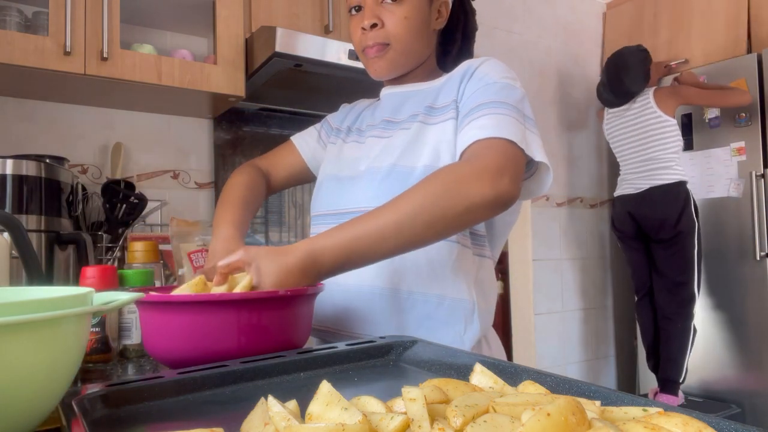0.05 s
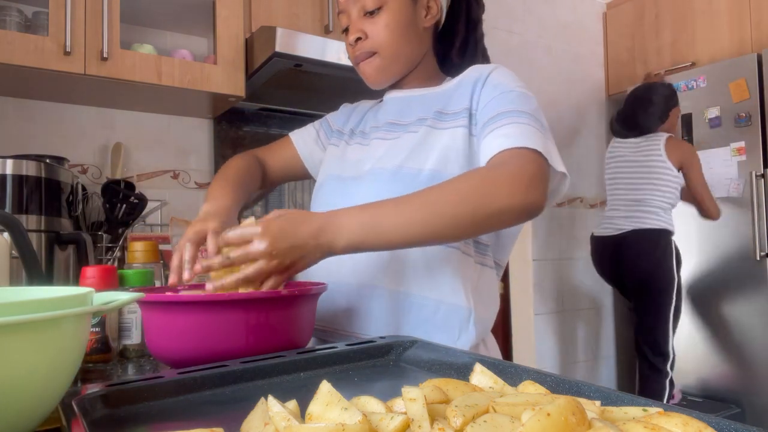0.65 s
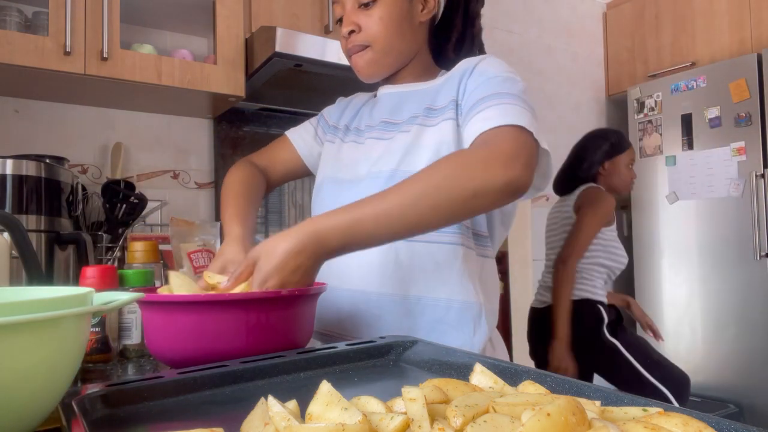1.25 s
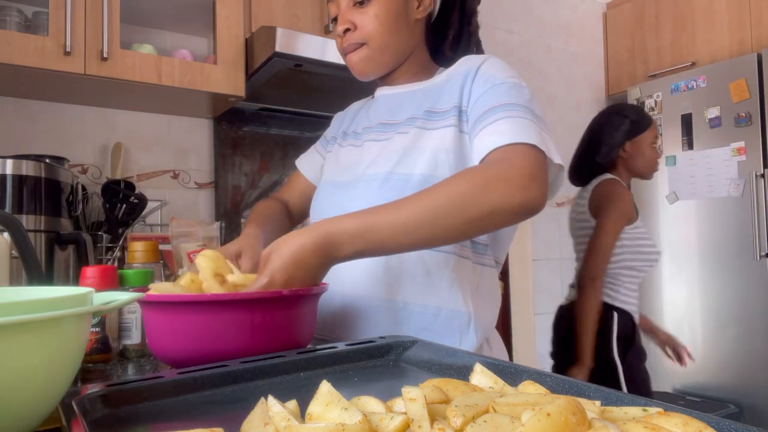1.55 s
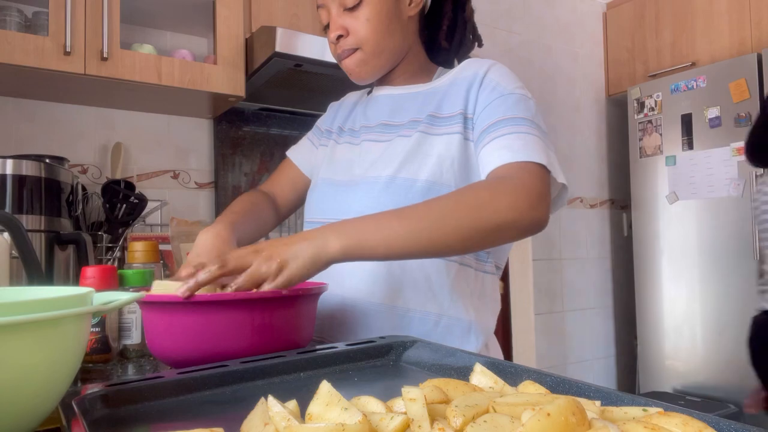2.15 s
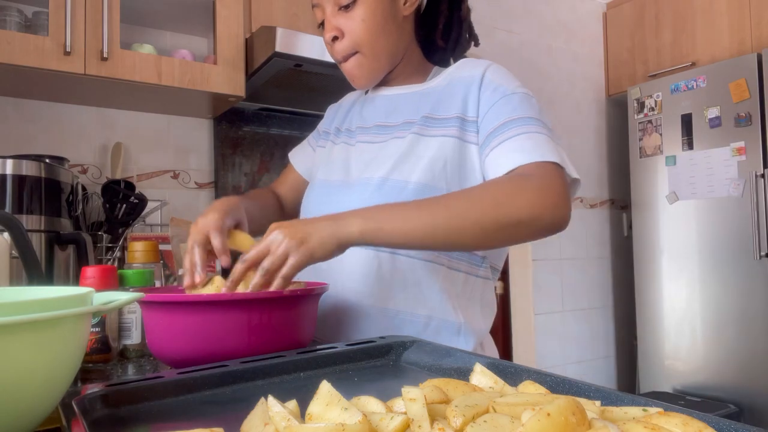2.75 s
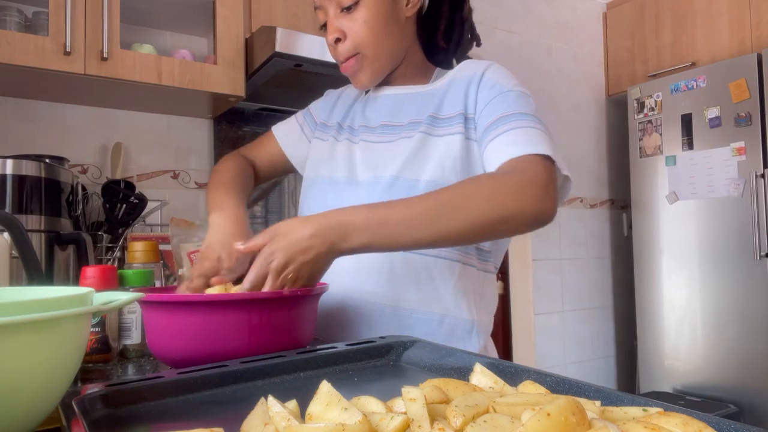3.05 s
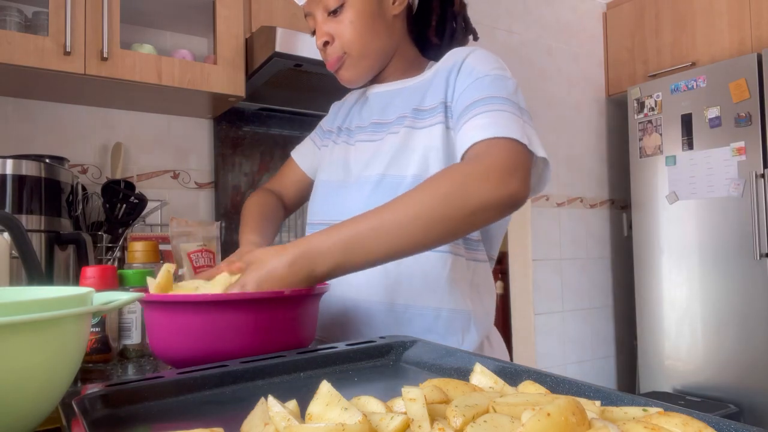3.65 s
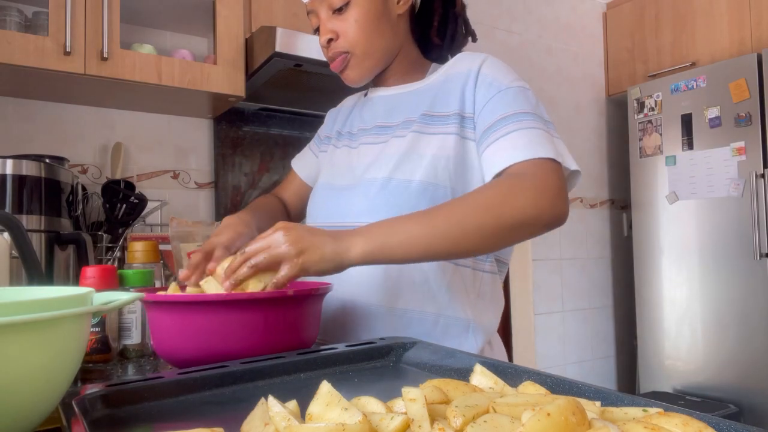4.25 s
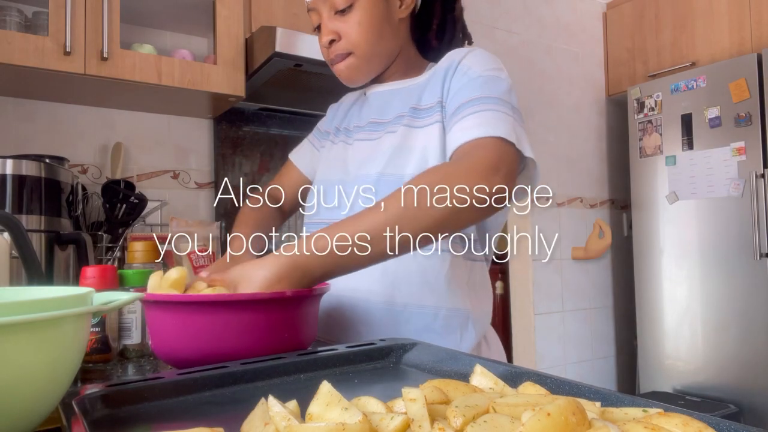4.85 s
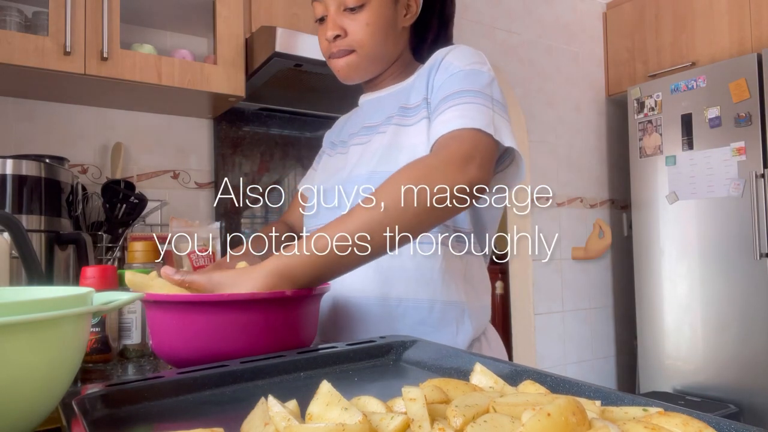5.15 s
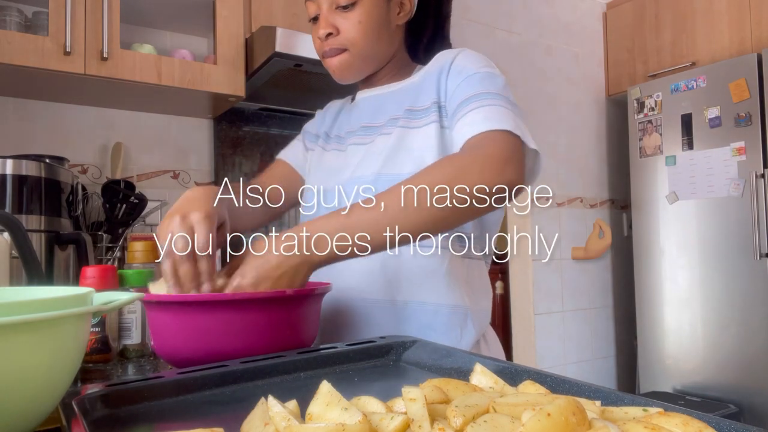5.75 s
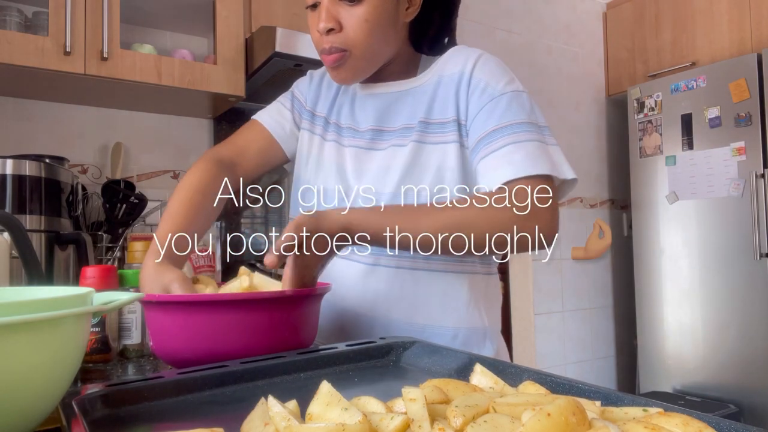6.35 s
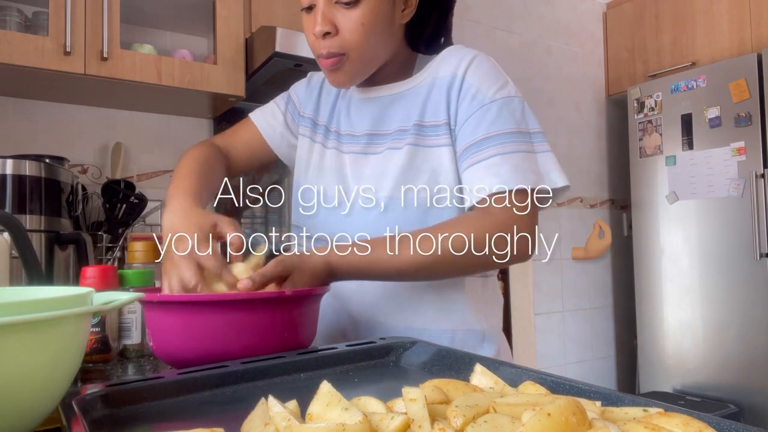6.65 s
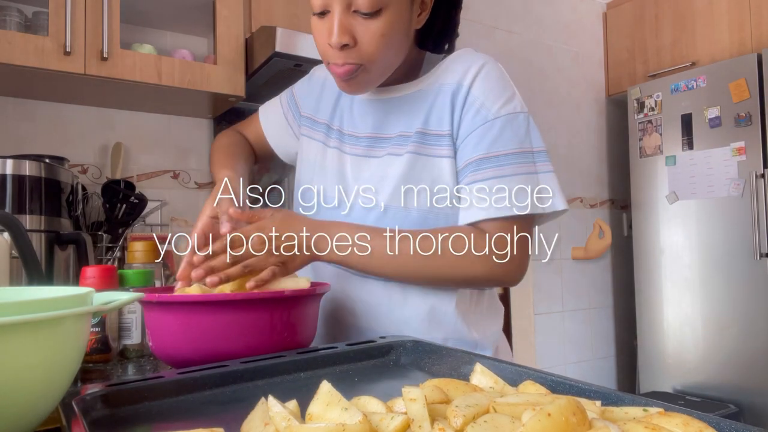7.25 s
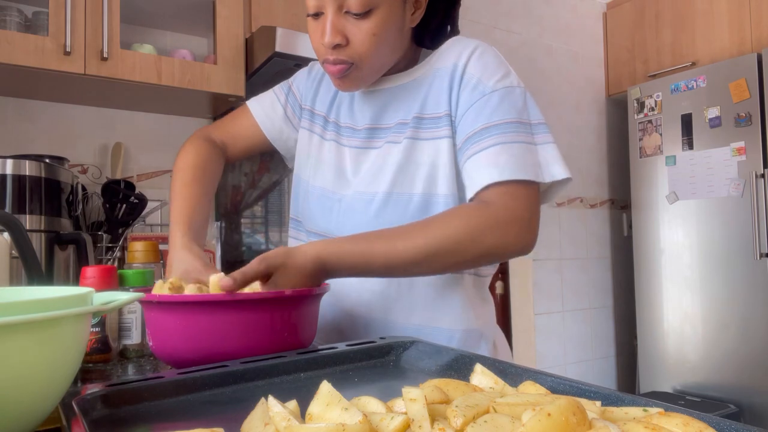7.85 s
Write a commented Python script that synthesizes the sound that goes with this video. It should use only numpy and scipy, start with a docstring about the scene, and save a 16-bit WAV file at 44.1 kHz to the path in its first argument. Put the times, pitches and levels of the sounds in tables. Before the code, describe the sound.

Hands toss and rub wet potato wedges in a plastic bowl, with hollow thuds and squelches, and a cupboard door slams early on.

```python
"""Wet thuds and rubbing: hands toss raw potato wedges in a plastic bowl on a kitchen counter.
Landings ring and rock the bowl, some with a bright wet splash or sizzle; wedges tap the wall.
Oily faces slap, scrape, squelch and snap apart. Further off a cupboard door slams and things
click and rattle. The tiled room rings briefly over a faint hush."""
import sys
import numpy as np
from scipy import signal
from scipy.fft import rfft, irfft
from scipy.io import wavfile
from scipy.ndimage import uniform_filter1d

SR = 44100
rng = np.random.default_rng(int(sys.argv[2]) if len(sys.argv) > 2 else 0)


def wav_out(sig):
    """Save sig, one row per channel (or a flat mono array), as 16-bit PCM at SR to the path in sys.argv[1]."""
    wavfile.write(sys.argv[1], SR, np.round(np.clip(np.atleast_2d(sig).T, -1, 1) * 32767).astype(np.int16))


N = 352359
EVENT_N = 24576  # samples per event
T = np.arange(EVENT_N) / SR
HZ = np.fft.rfftfreq(EVENT_N, 1 / SR)

# handfuls landing: (time [s], level [dB], push centre [Hz], slap re thud [dB], landing spread [s])
HANDFULS = [(0.022, -39, 307, -16.5, 0.091), (0.476, -28, 277, -9, 0.028), (.699, -27, 227, -2.5, 0.033),
            (0.921, -18, 224, 0, 0.025), (1.251, -23, 285, -21, 0.051), (2.005, -36.5, 250, -10, 0.022),
            (4.067, -38, 292, -6, 0.11), (4.555, -38, 250, -11, 0.097), (5.741, -30, 293, -22, 0.039),
            (6.351, -28.5, 193, -21, .018), (6.529, -25.5, 365, -11.5, 0.051),
            (6.754, -32, 315, -14, 0.011), (6.805, -24, 397, -9, 0.014), (7.186, -37, 225, -19, 0.042)]
# heavy wedges landing singly: (time [s], level [dB], push centre [Hz])
HEAVY_WEDGES = [(.926, -17, 256), (.935, -15.5, 526), (.938, -17.5, 249), (.95, -19.5, 241),
                (.967, -23, 298), (1.665, -37, 405), (1.882, -32.5, 315), (1.949, -33.5, 595),
                (3.99, -37, 208), (4.395, -35.5, 350), (4.603, -32, 177), (5.019, -38, 342),
                (6.355, -32.5, 424), (6.806, -16.5, 433), (6.812, -16.5, 295), (6.83, -24.5, 434),
                (6.92, -31.5, 288), (7.033, -42, 258), (7.328, -35, 610), (7.86, -36, 138)]
# slap spectrum: (frequency [Hz], level [dB])
SLAP_SPECTRUM = [(200, -3), (500, -2.5), (900, -2), (3300, -9), (5000, -19), (7500, -20.5), (9500, -31.5),
                 (16000, -30.5)]


def thuds(wedges=6):
    """Wedges land in quick succession: soft pushes ring the bowl, wet faces slap."""
    out = np.zeros((2, N))
    for time_s, db, hz, slap_db, spread_s in HANDFULS:
        body_db = bowl_db(floor_db=1.5, shift_oct=0.025 * rng.uniform(-1.2, 1))
        jitter, weight = rng.random((2, wedges))
        land_s = (np.arange(wedges) + jitter) / wedges * spread_s
        landings = np.zeros(EVENT_N)
        landings[((land_s - land_s[0]) * SR).astype(int)] = 0.5 + weight * np.hanning(wedges)
        jolts = landings * rng.choice([-1, 1], EVENT_N)
        thud = unit_peak(kitchen(colour(jolts, body_db + push_db(hz)), wet_db=7))
        slap = contact_burst(landings, spectrum(SLAP_SPECTRUM), decay_s=0.002, wet_db=2, snap_db=-2)
        add(out, time_s, amp(db) * (thud + amp(slap_db) * slap))
    return amp([[-0.6], [0.8]]) * out


def drops():
    """One heavy wedge hits the bottom: a hollow plastic knock."""
    out = np.zeros((2, N))
    for time_s, db, hz in HEAVY_WEDGES:
        body_db = bowl_db(floor_db=-11, shift_oct=0.025 * rng.uniform(-0.071, 1))
        knock = colour(signal.unit_impulse(EVENT_N), body_db + push_db(hz))
        add(out, time_s, amp(db) * unit_peak(kitchen(knock, wet_db=-0.5)))
    return out


def taps():
    """A wedge knocks the wall, too blunt for treble: a short hollow note with some bowl ring."""
    # wall contacts: (time [s], level [dB], pitch [Hz])
    contacts = [(.404, -22, 1260), (1.638, -39, 962), (1.861, -35.5, 590), (5.741, -34, 1210),
                (6.708, -34, 3160), (6.747, -26.5, 1385), (7.1456, -24.5, 940), (7.177, -21, 1000),
                (7.381, -27.5, 740)]
    out = np.zeros((2, N))
    body_db = bowl_db(floor_db=-24.5)
    blunt_db = -10 * np.log10(1 + (HZ / 2500) ** 10)
    for time_s, db, hz in contacts:
        hollow_db = 7 * np.exp(-(octaves(hz) / 0.51) ** 2) - 7 * abs(octaves(hz))
        knock = colour(signal.unit_impulse(EVENT_N), body_db + blunt_db + hollow_db)
        add(out, time_s, amp(db) * unit_peak(kitchen(knock, wet_db=-0.5)))
    return amp(-0.5) * out


def bowl_db(floor_db=-13, shift_oct=0):
    """Bowl modes over the flat, dead sound of the load; load and hands retune them by shift_oct."""
    # bowl modes: (frequency [Hz], width [Hz], level [dB])
    modes = [(138.6, 19.6, 8), (187.6, 18, 3.5), (242.7, 81, 1), (315, 30, 2), (412.7, 5.2, 3.5),
             (539.3, 10.6, -1), (649, 29, -0.5), (922, 78, -9.5)]
    power = sum(amp(db) ** 2 / (1 + (2 * (HZ - hz * 2 ** shift_oct) / width_hz) ** 2)
                for hz, width_hz, db in modes)
    return 10 * np.log10(power + amp(floor_db) ** 2)


def push_db(hz):
    """Spectrum of a soft landing: centred on hz, thin in the bass."""
    bass_cut_db = 9.5 * np.maximum(-octaves(0.7 * hz), 0)
    return -21.5 * np.hypot(octaves(hz), 0.87) - bass_cut_db


def rubbing(drift_oct=0.32):
    """Strokes drag wedges over each other; the hollow under the moving hands rings and glides."""
    # hand strokes: (start [s], length [s], level [dB], treble shelf [dB], hollow pitch [Hz])
    strokes = [(0, .93, -52, 4.5, 1210), (1.063, 0.29, -37.5, -4, 1070), (1.487, 0.23, -50.5, 2, 1230),
               (1.924, 0.45, -53, 8, 1540), (2.955, 0.47, -41.5, 2, 650), (3.482, 0.21, -41, -0.5, 1360),
               (3.778, 0.34, -53.5, 6.5, 2000), (4.057, 0.084, -50, 15.5, 520),
               (4.366, .28, -48, 9.5, 2650), (4.74, 0.47, -52, 1.5, 2730), (4.901, 0.082, -45.5, -9, 740),
               (5.479, 0.1, -54, -14, 1510), (5.631, 0.35, -51.5, 5, 2730), (5.921, 0.53, -43.5, 2, 650),
               (6.035, 0.12, -46, 5, 2480), (6.443, 0.088, -37.5, -0.5, 2800),
               (7.338, 0.2, -37.5, -1, 1130), (7.645, 0.16, -39, 2.5, 2000), (7.938, 1, -33.5, 2.5, 690)]
    # rubbing spectrum: (frequency [Hz], level [dB])
    rub_spectrum = [(150, -28.5), (450, 6), (680, 9.5), (1150, 9), (2000, -1), (2800, 1.5), (3600, -5.5),
                    (6500, -14), (9000, -25.5), (13000, -25.5)]
    out, swish = np.zeros((1, N)), friction()
    shelf = 1 / (1 + (3250 / (HZ + 1)) ** 4)
    for start_s, length_s, db, treble_db, hollow_hz in strokes:
        t = np.arange(int((length_s + 0.05) * SR)) / SR
        progress = np.minimum(t / length_s, 1)
        drag = np.resize(swish[round(start_s * SR):], len(t)) * arch(progress, exponent=0.37)
        glide_hz = hollow_hz * 2 ** (drift_oct * rng.choice([-1, 1]) * (progress - 0.5))
        drag += amp(-5.5) * resonate(drag, glide_hz, width_hz=67)
        add(out, start_s, amp(db) * colour(drag, spectrum(rub_spectrum) + treble_db * shelf)[None])
    return amp(-8) * kitchen(out[0], wet_db=9.5)


def friction(slips_per_s=1500, spread_db=4, pops_per_s=220, clump_db=2.5):
    """Tiny slips and wet pops over a smooth swish, clumped as edges catch."""
    slips = (rng.random(N) < slips_per_s / SR) * rng.standard_normal(N)
    slips *= amp(spread_db * np.minimum(rng.exponential(1, N), 3))
    pops, pocket_hz = np.zeros(N), np.geomspace(1100, 3200, 10)
    for hz in pocket_hz:
        openings = (rng.random(N) < pops_per_s / len(pocket_hz) / SR) * rng.random(N)
        pocket = signal.iirpeak(hz, Q=4, fs=SR)
        pops += signal.lfilter(*pocket, signal.lfilter(*pocket, openings))
    catching = unit_rms(uniform_filter1d(uniform_filter1d(rng.standard_normal(N), size=600), size=300))
    texture = unit_rms(slips) + rng.standard_normal(N) + amp(-5.5) * unit_rms(pops)
    return unit_rms(texture * amp(clump_db * np.clip(catching, -2, 2)))


def squelches(pockets=14, spread_s=0.027, scatter_oct=0.46):
    """Oily faces part: pockets of oil and air pop one after another."""
    # partings: (time [s], level [dB], centre pitch [Hz])
    partings = [(2.065, -46.5, 1600), (3.527, -40, 1510), (3.721, -41.5, 1530), (4.575, -44.5, 2260),
                (6.271, -43, 2440), (6.557, -33, 1410), (7.765, -39.5, 2270)]
    out = np.zeros((2, N))
    for time_s, db, hz in partings:
        onset, detune, strength = rng.random((3, pockets, 1))
        pop_hz = hz * 2 ** (scatter_oct * (2 * detune - 1))
        age_s = np.maximum(T - spread_s * (onset - onset.min()), 0)
        pops = strength ** 2 * pop(pop_hz * age_s, decay_cycles=1.4)
        add(out, time_s, amp(db) * unit_peak(kitchen(pops.sum(0), wet_db=12.5)))
    return out


def snaps():
    """One wet wedge slips off another, close and fairly dry."""
    # releases: (time [s], level [dB], pitch [Hz])
    releases = [(4.067, -45, 1700), (4.384, -47, 1150), (4.461, -45.5, 2200), (4.529, -52, 2400),
                (4.641, -44, 2350), (5.177, -50, 2700), (5.725, -51, 2290), (5.7406, -47.5, 1750),
                (5.761, -46, 1810), (5.8374, -46.5, 2150), (5.8721, -49, 2960)]
    out = np.zeros((2, N))
    for time_s, db, hz in releases:
        snap = kitchen(pop(hz * T, decay_cycles=1), wet_db=0, lag_s=0)
        add(out, time_s, amp(db) * unit_peak(snap))
    return out


def pop(cycles, decay_cycles):
    """A pocket of oil and air opens and rings briefly."""
    return np.sin(2 * np.pi * cycles) * (1 - np.exp(-cycles)) * np.exp(-cycles / decay_cycles)


def rumble():
    """The loaded bowl shifts and judders on the counter."""
    # rumble spectrum before the bowl modes: (frequency [Hz], level [dB])
    rumble_spectrum = [(35, -28), (62, 12), (90, 4.5), (140, -11), (330, -7.5), (1000, -11), (3000, -51)]
    judder_db = 2 * unit_rms(uniform_filter1d(rng.standard_normal(N), size=1000))
    shape_db = spectrum(rumble_spectrum) + 1.14 * bowl_db()
    noise = np.array([colour(x, shape_db) for x in diffuse_noise(N)])
    return amp(1.5) * unit_rms(noise * amp(judder_db)) * bowl_motion()


def bowl_motion(steady_db=-47.5, rise_s=0.014):
    """Rumble envelope: steady handling, shoves, and a rock after each landing that grows with its level."""
    # shoves along the counter: (start [s], length [s], level [dB])
    shoves = [(1.04, 0.22, -39), (1.928, 0.22, -44), (5.008, 0.15, -49)]
    t = np.arange(N) / SR
    power = np.full((1, N), amp(steady_db) ** 2)
    for start_s, length_s, db in shoves:
        progress = np.clip((t - start_s) / length_s, 0, 1)
        power += (amp(db) * arch(progress, exponent=0.28)) ** 2
    rock = T / rise_s * np.exp(1 - T / rise_s)
    for time_s, db, *_ in HANDFULS + HEAVY_WEDGES:
        add(power, time_s, (amp(-31.5 + 0.26 * db) * rock[None]) ** 2)
    return np.sqrt(power[0])


def door(shut_s=0.559):
    """The door cracks against its frame; the cupboard booms."""
    # panel and carcass modes: (frequency [Hz], level [dB], T60 [s])
    modes = [(51, -16, 0.52), (70.6, -11, 0.43), (130.3, -7, 0.39), (157, -6.5, 0.25), (208.3, -16.5, 0.28),
             (295, -25.5, 0.78), (470, -19.5, 0.35), (1148, -19, 0.21)]
    out = np.zeros((2, N))
    boom = sum((-1) ** k * amp(db) * 1e-3 ** (T / t60_s) * np.sin(2 * np.pi * hz * T)
               for k, (hz, db, t60_s) in enumerate(modes))
    boom *= 1 - np.exp(-T / 0.003)
    add(out, shut_s, amp(-3.5) * kitchen(boom, wet_db=-15, lag_s=0.0002))
    wood_db = spectrum(SLAP_SPECTRUM) - 4 * np.logaddexp2(0, 2 * octaves(4100))  # wood: little treble
    crack = contact_burst(signal.unit_impulse(EVENT_N), wood_db, decay_s=0.0054, wet_db=27, snap_db=11)
    add(out, shut_s - 0.002, amp(-16) * crack)
    return out


def clatter_and_splashes(ring_sharpness=11):
    """Far clicks and rattles, plus the bright wet splash and sizzle of wedges landing in the bowl."""
    # bursts: (time [s], level [dB], pitch [Hz], treble slope [dB/octave], decay [s])
    bursts = [(0.318, -39, 3370, -5.5, 0.0025), (0.693, -37, 1900, -5, 0.039),
              (1.055, -33, 2140, -2.5, 0.032), (1.091, -29, 1550, -12, 0.005), (1.097, -47, 7460, 2, 0.13),
              (1.453, -45.5, 3570, -2, 0.047), (1.804, -42, 2290, -18.5, 0.017),
              (1.9, -45.5, 3640, 1.5, 0.073), (2.391, -29, 3300, -1.5, 0.014),
              (2.831, -43, 2520, -2, 0.047), (2.855, -25.5, 1650, -1.5, 0.0092),
              (3.188, -34.5, 3220, -2, 0.0093), (3.197, -29.5, 1610, -26, 0.0026),
              (3.41, -40.5, 3470, -4, 0.022), (3.886, -45, 1680, -15, 0.0084),
              (6.803, -39.5, 7200, -0.5, 0.0072), (7.549, -39, 2700, -18.5, 0.00055)]  # the two above 7 kHz are the sizzle and the splash
    # base spectrum: (frequency [Hz], level [dB])
    burst_spectrum = [(400, -3), (1000, 2), (3500, 2.5), (7000, 1.5), (13000, -7), (16000, -15)]
    out = np.zeros((2, N))
    for time_s, db, hz, slope_db_per_oct, decay_s in bursts:
        ring_db = 3.5 - 0.3 * slope_db_per_oct  # dull, hollow things ring most
        note_db = 10 * np.log10(1 + amp(ring_db) ** 2 / (1 + (ring_sharpness * octaves(hz)) ** 2))
        treble_db = slope_db_per_oct * np.logaddexp2(0, 2 * octaves(3500)) / 2
        shape_db = spectrum(burst_spectrum) + note_db + treble_db
        snap_db = 12.5 - 347 * decay_s  # long bursts start without a snap
        burst = contact_burst(signal.unit_impulse(EVENT_N), shape_db, decay_s, wet_db=4.5, snap_db=snap_db)
        add(out, time_s, amp(db) * burst)
    return out


def contact_burst(strikes, shape_db, decay_s, wet_db, snap_db, echo_s=0.023):
    """Countless tiny contacts die away after each strike; the room carries them on."""
    rise_s = 0.0025 + 5 * decay_s ** 2  # long bursts swell in
    contacts = (1 - np.exp(-T / rise_s)) ** 2 * np.exp(-2 * T / decay_s)
    direct = signal.fftconvolve(strikes ** 2, contacts)[:EVENT_N]
    echo = (1 - np.exp(-T / 0.00048)) * np.exp(-T / echo_s)
    power = abs(direct + amp(wet_db) ** 2 * signal.fftconvolve(direct, echo / echo.sum())[:EVENT_N])
    # top treble arrives mostly direct, as a snap at first contact
    snap = diffuse_noise(EVENT_N) * np.exp(-T / 0.003) * np.sqrt(power.max()) * amp(snap_db)
    snap = signal.sosfilt(signal.butter(3, 7500, "high", fs=SR, output="sos"), snap)
    burst = diffuse_noise(EVENT_N) * np.sqrt(power) + snap
    return unit_peak(np.array([colour(x, shape_db) for x in burst]))


def kitchen(x, wet_db, lag_s=0.00045):
    """Direct sound, lag_s later on the left, plus the room's echo."""
    paths = amp(wet_db) * room_echo()
    paths[1, 0] += 1
    paths[0, round(lag_s * SR)] += 1
    return signal.fftconvolve(x[None], paths, axes=1)[:, :len(x)]


def room_echo():
    """Echo from one spot in the kitchen; each band dies at its own rate."""
    # room decay: (frequency [Hz], T60 [s])
    decay_times = [(100, 0.46), (260, 0.27), (1840, 0.32), (12800, 0.41)]
    hz, t, bands = signal.stft(diffuse_noise(EVENT_N), SR, nperseg=256)
    bands *= 1e-3 ** (t / spectrum(decay_times, hz)[:, None])
    echo = signal.istft(bands, SR)[1][:, :EVENT_N]
    onset = np.clip((T - 0.002) / 0.0025, 0, 1)
    early = 1 + 10.5 * np.exp(-T / 0.003)  # counter and tiles answer first
    return unit_rms(echo * onset * early) / np.sqrt(EVENT_N)


def hush():
    """Steady kitchen background."""
    # background spectrum: (frequency [Hz], level [dB])
    hush_spectrum = [(60, -27.5), (200, -13.5), (600, -33.5), (2500, -26.5), (5000, -41.5), (9000, -46.5)]
    return amp(-61) * unit_rms(np.array([colour(x, spectrum(hush_spectrum)) for x in diffuse_noise(N)]))


def diffuse_noise(count):
    """Stereo noise with the coherence of diffuse sound."""
    # left-right likeness: (frequency [Hz], coherence [-1 to 1])
    likeness = [(140, 0.97), (280, 0.85), (480, 0.3), (850, -0.4), (1500, -0.1), (5000, 0.31),
                (9000, -0.98), (13000, 0.99)]
    mid, side = rfft(rng.standard_normal((2, count)))
    coherence = spectrum(likeness, np.fft.rfftfreq(count, 1 / SR))
    mid, side = mid * np.sqrt(1 + coherence), side * np.sqrt(1 - coherence)
    return irfft([mid + side, mid - side], count)


def colour(x, db):
    """Minimum-phase filter: rings after a blow, never before."""
    log_gain = np.log(amp(np.maximum(db, db.max() - 90)))
    mirrored = np.concatenate([log_gain, log_gain[-2:0:-1]])
    response = np.fft.ifft(np.exp(np.conj(signal.hilbert(mirrored)))).real
    return signal.fftconvolve(x, response[:EVENT_N // 4])[:len(x)]


def resonate(x, hz, width_hz):
    """Unity-gain resonance with a moving pitch."""
    carrier = np.exp(2j * np.pi * np.cumsum(hz) / SR)
    pole = np.exp(-np.pi * width_hz / SR)
    return 2 * (carrier * signal.lfilter([1 - pole], [1, -pole], x / carrier + 1e-18)).real


def arch(progress, exponent):
    """Hand speed: up from rest and back over progress 0 to 1."""
    return (4 * progress * (1 - progress)) ** exponent


def spectrum(points, hz=HZ):
    """Table interpolated over log frequency."""
    point_hz, values = np.transpose(points)
    return np.interp(np.log(hz + 1), np.log(point_hz), values)


def octaves(hz):
    """Each bin's offset from hz."""
    return np.log2((HZ + 1) / hz)


def amp(db):
    """Decibels to gain."""
    return 10 ** (np.asarray(db) / 20)


def unit_rms(x):
    """Scales to rms 1."""
    return x / np.sqrt(np.mean(x ** 2) + 1e-20)


def unit_peak(x):
    """Scales the loudest 10 ms to rms 1."""
    power = np.mean(np.atleast_2d(x) ** 2, axis=0)
    return x / np.sqrt(uniform_filter1d(power, size=441).max() + 1e-20)


def add(mix, time_s, sound):
    """Mixes sound in at time_s."""
    part = mix[:, max(round(time_s * SR), 0):][:, :sound.shape[1]]
    part += sound[:, :part.shape[1]]


def scene():
    """All sources, slightly louder on the right."""
    mix = thuds() + drops() + taps() + squelches() + snaps() + rubbing() + rumble()
    return (mix + door() + clatter_and_splashes() + hush()) * amp([[-0.4], [0.4]])


def record(dry):
    """Band limit: 42 Hz to 16.1 kHz."""
    dry = signal.sosfilt(signal.butter(4, 42, "high", fs=SR, output="sos"), dry)
    lowpass = signal.firwin(511, 16100, window=("kaiser", 9), fs=SR)
    return signal.oaconvolve(dry, lowpass[None], "same")


dry = scene()
out = record(dry)
wav_out(out)
```